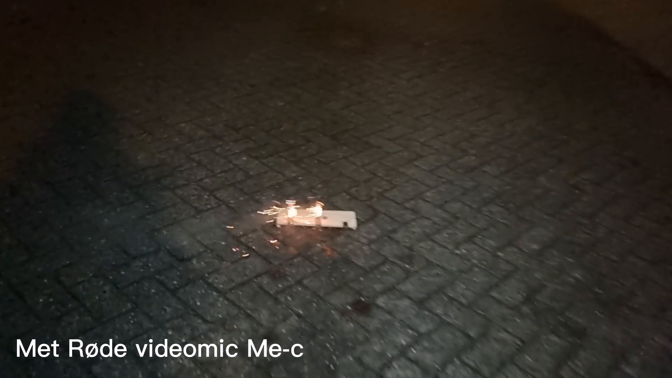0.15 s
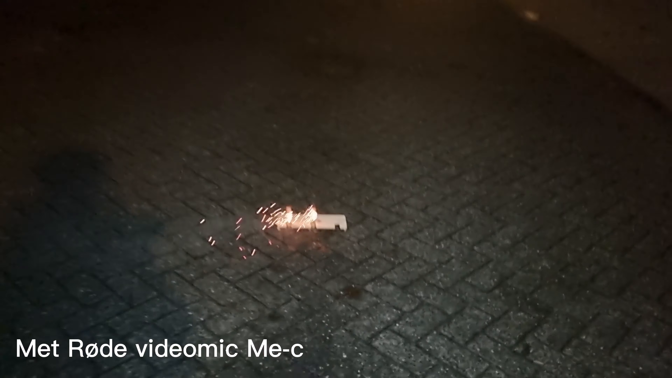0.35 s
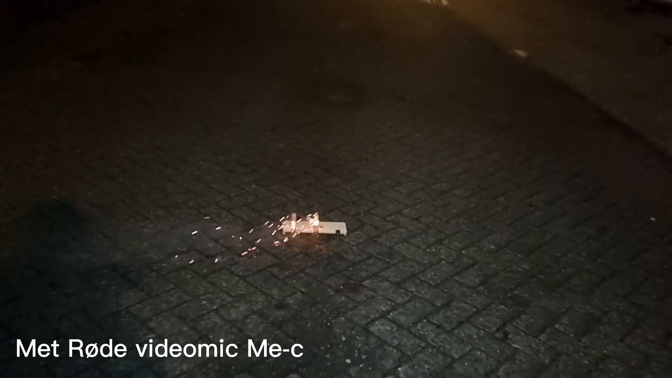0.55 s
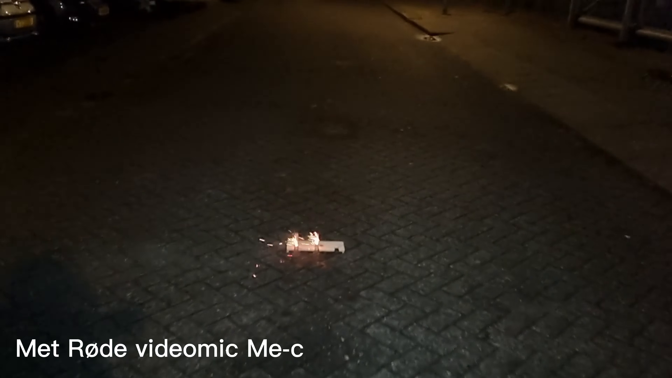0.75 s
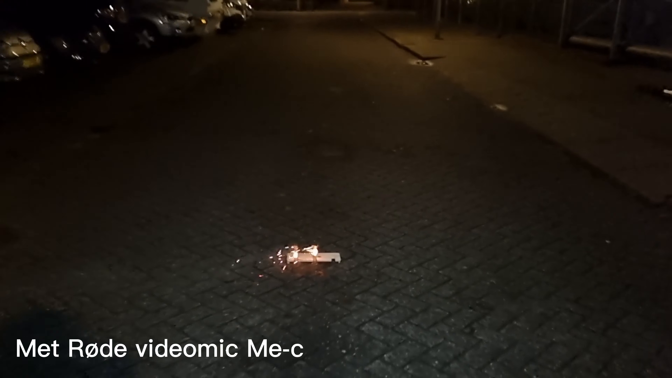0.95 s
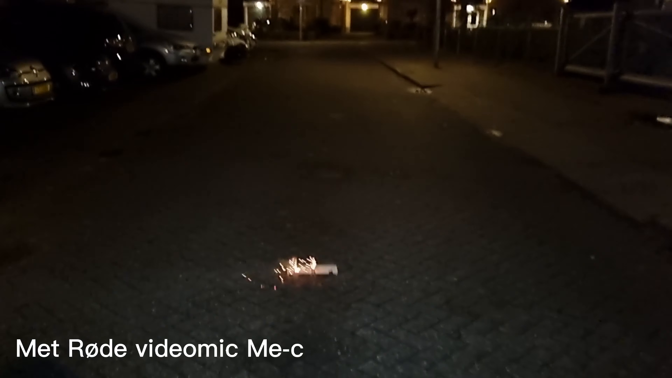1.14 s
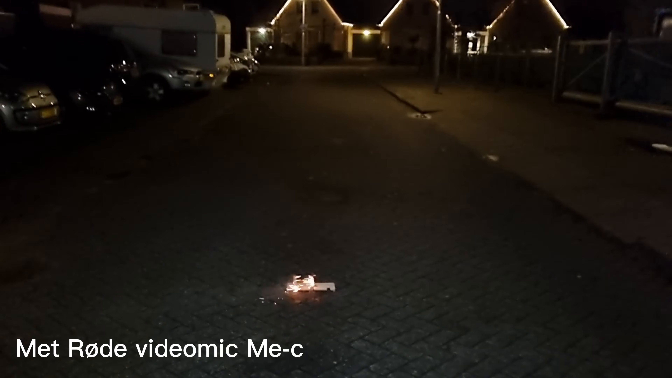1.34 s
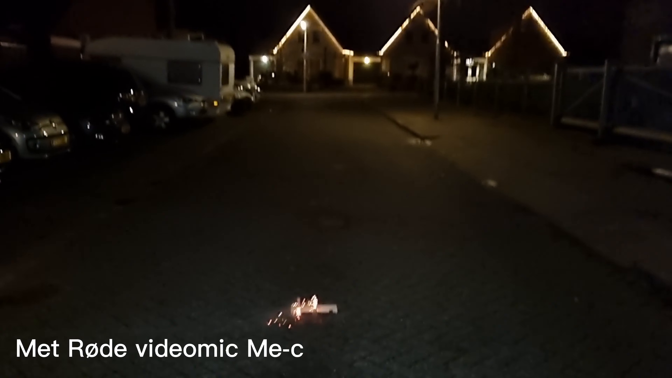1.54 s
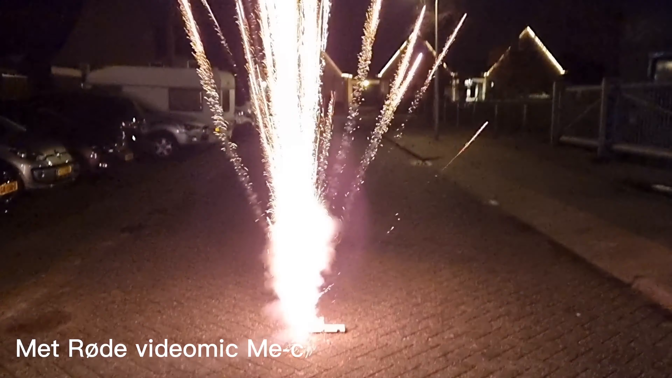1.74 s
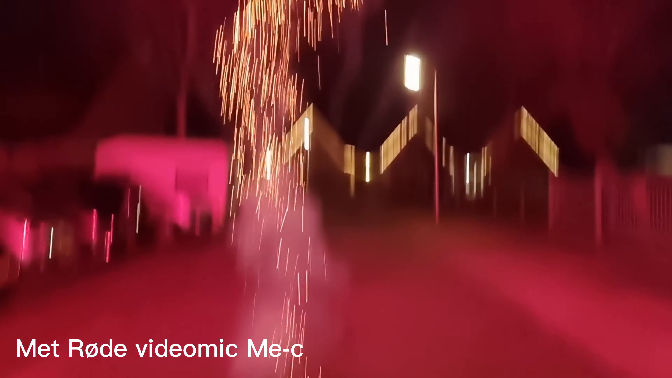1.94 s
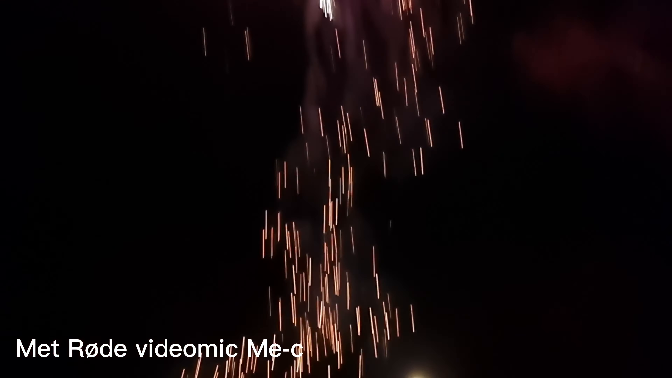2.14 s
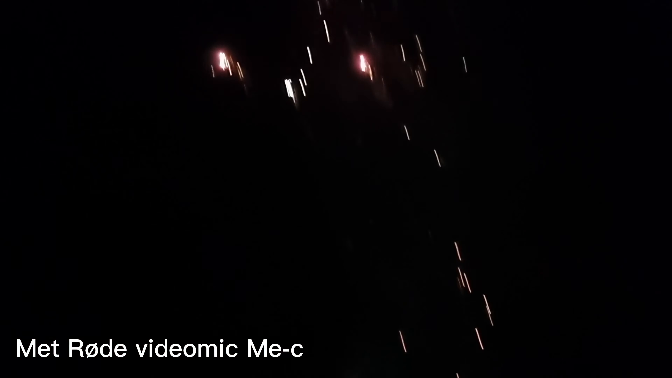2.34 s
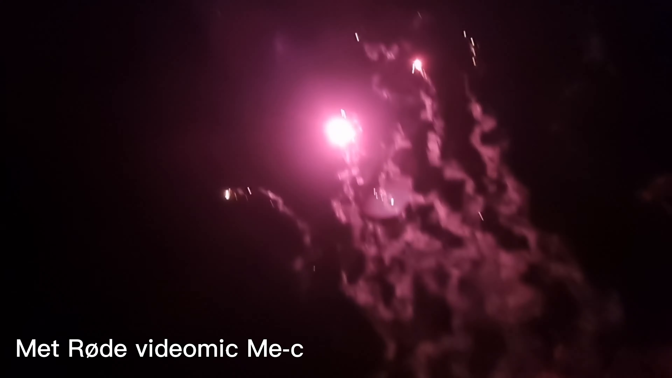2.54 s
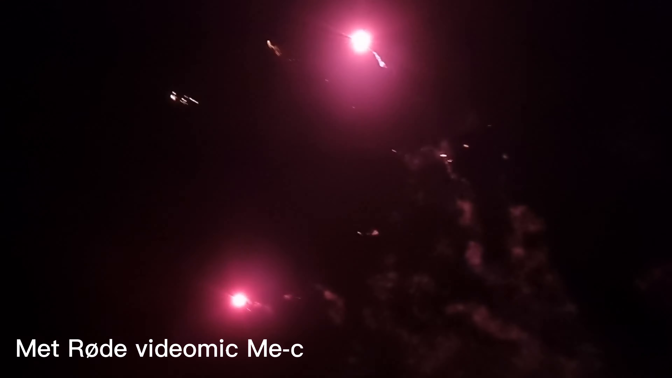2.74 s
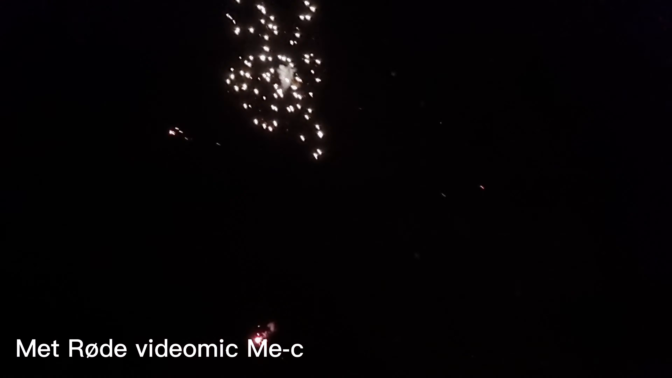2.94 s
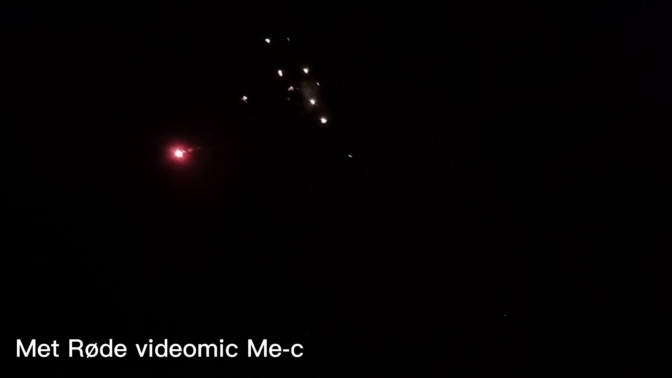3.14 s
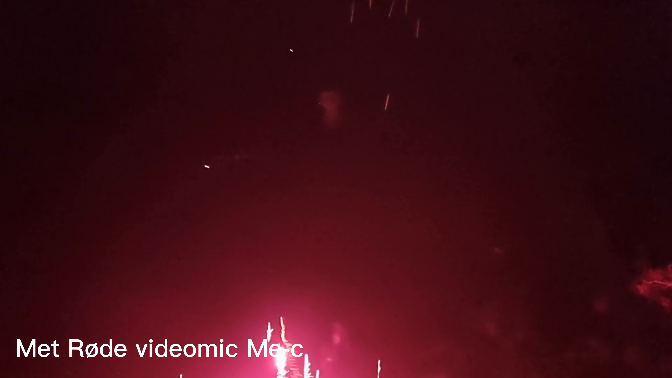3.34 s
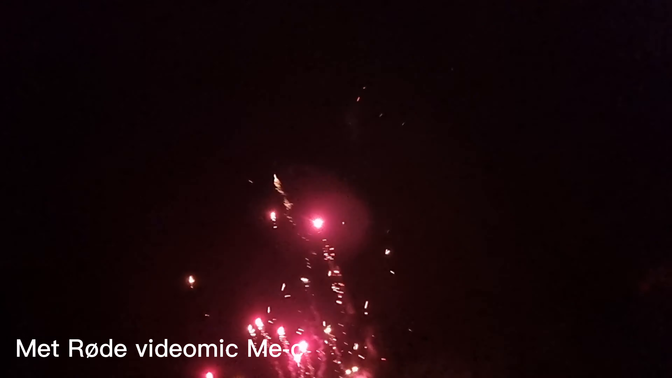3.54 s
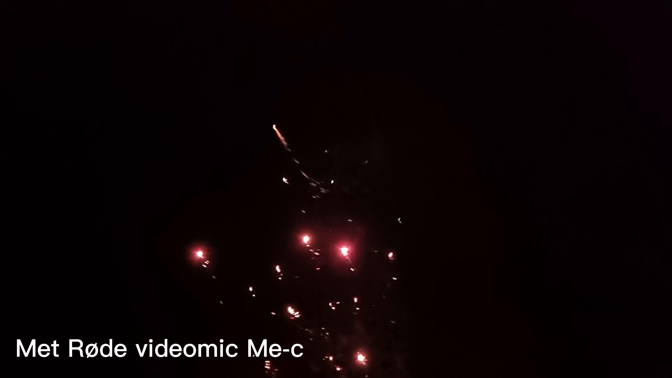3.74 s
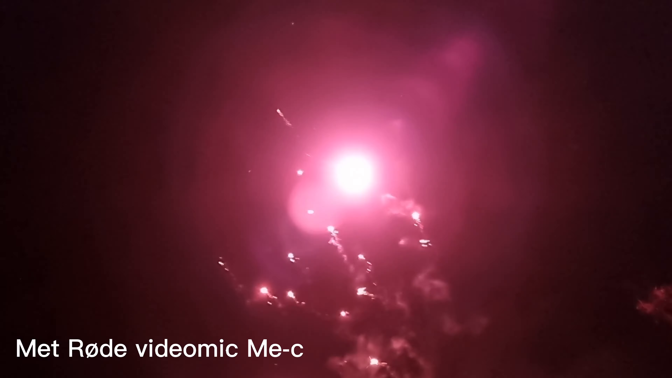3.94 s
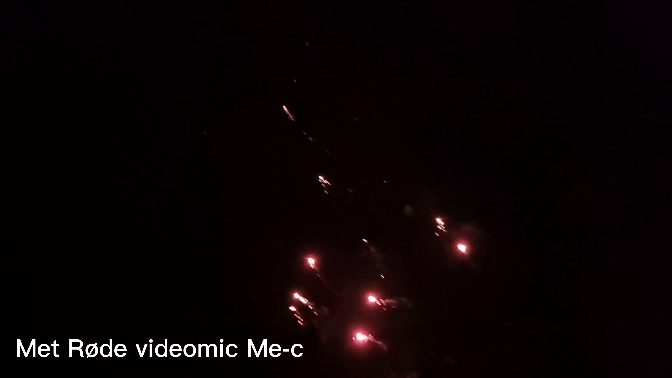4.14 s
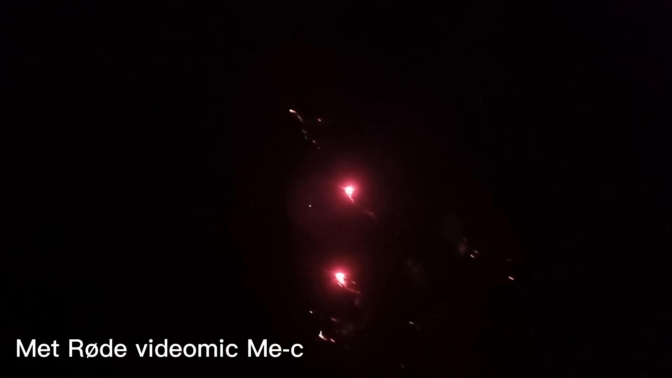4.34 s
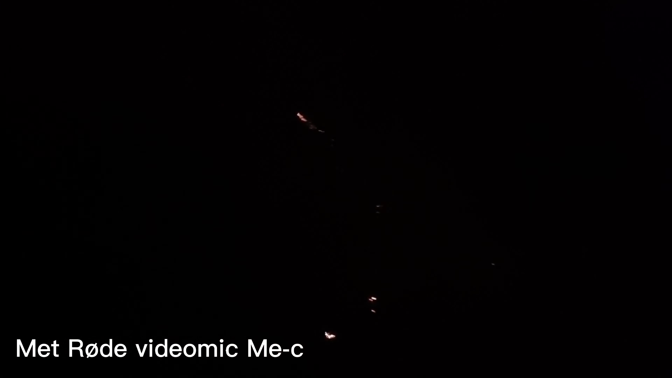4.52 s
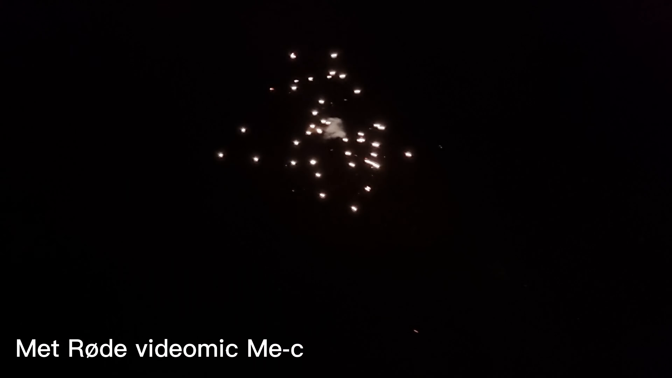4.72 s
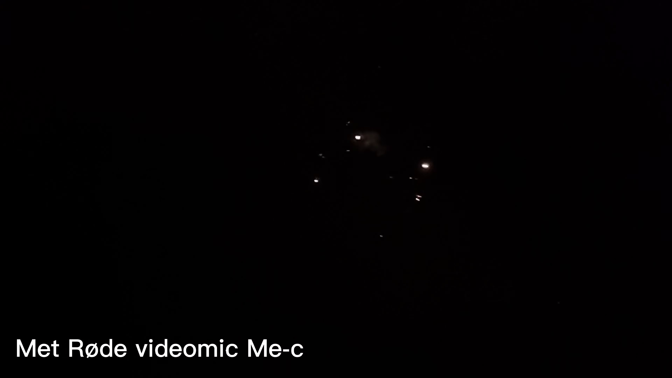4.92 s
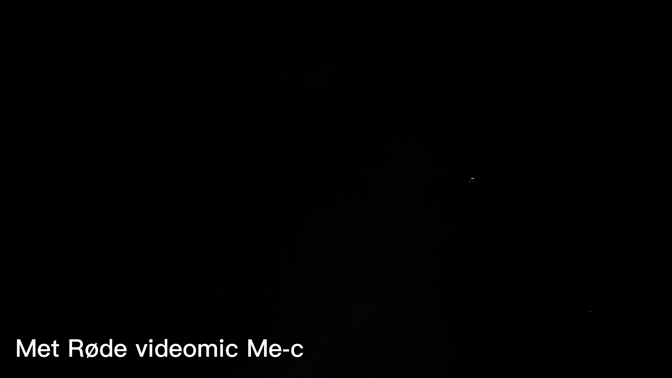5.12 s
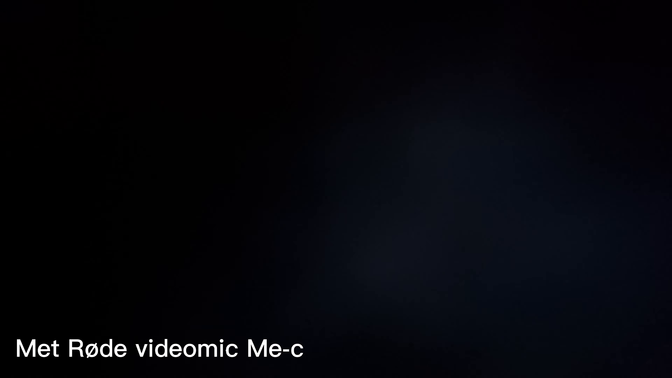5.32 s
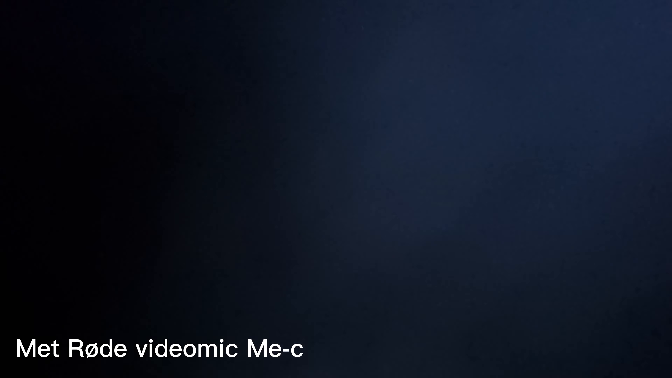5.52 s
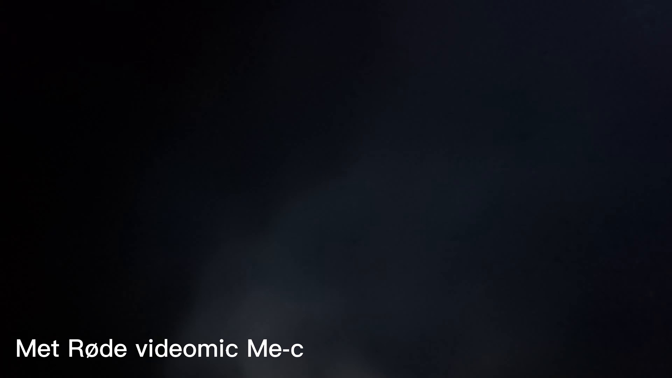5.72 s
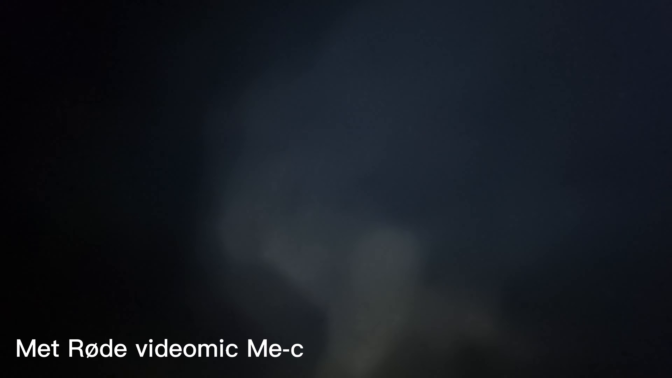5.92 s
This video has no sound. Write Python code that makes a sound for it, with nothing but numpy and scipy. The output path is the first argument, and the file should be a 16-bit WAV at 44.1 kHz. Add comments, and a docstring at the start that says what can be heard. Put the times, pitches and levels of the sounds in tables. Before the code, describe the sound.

A fuse hisses and sputters outdoors, with soft bumps and air rumble on a hand-held microphone. Then a small firework fires two shots, each a hard launch bang followed by faint hissing sparks and a sharp crack overhead. The middle two of the four bangs come close together. All overload briefly and ring along the street, their echoes growing duller until a faint distant town background remains.

```python
"""Paved street at night: a small firework cake fires two shots. The fuse fizzes, each charge lifts off,
its stars hiss upward and the shell bursts overhead. Each blast pins the microphone briefly, then echoes
from cars and house fronts, duller with distance. The hand-held microphone picks up bumps and air rumble;
a distant town lies underneath."""
import sys
import numpy as np
from scipy import signal
from scipy.fft import rfft, irfft, next_fast_len
from scipy.io import wavfile

SR = 44100
rng = np.random.default_rng(int(sys.argv[2]) if len(sys.argv) > 2 else 0)


def master(y):
    """Save y as 16-bit WAV."""
    cut = np.clip(np.atleast_2d(y).T, -1, 1)
    pcm = np.round(cut * 32767)  # scale
    wavfile.write(sys.argv[1], SR, pcm.astype(np.int16))


N = 263277
TIME_S = np.arange(N) / SR

# Spectra of town, air rumble, flame, fuse hiss, tube rush, star hiss: f/Hz, level/dB
TOWN_SPECTRUM = [(60, 0), (300, -11.5), (700, -7.5), (1500, -20.5), (3000, -23), (6000, -33), (15000, -48)]
RUMBLE_SPECTRUM = [(15, -45.5), (25, 10.5), (64, 4.5), (81, 4.5), (236, -5.5), (394, -14.5), (430, -17),
                   (464, -24.5), (500, -15.5), (650, -51.5), (1100, -120)]
FLAME_SPECTRUM = [(300, 1), (600, -0.5), (1100, -1), (2000, -5), (3800, -5.5), (5500, -8), (7000, -10.5),
                  (10000, -45.5)]
FUSE_SPECTRUM = [(2940, -54.5), (5000, -5.5), (5550, -13), (6460, -7), (7100, -3.5), (8540, 0.5),
                 (10500, -6.5), (12300, -3), (14900, -3.5), (15500, -5)]
TUBE_SPECTRUM = [(120, -34.5), (200, 2.5), (237, 4.5), (613, -1.5), (689, -0.5), (897, -14), (1170, -9),
                 (2500, -43.5), (3250, -53.5), (5500, -120)]
STAR_SPECTRUM = [(2940, -9), (5000, -5), (6340, -7), (8500, -1), (10800, -11), (14000, -8), (15500, -13.5)]
# Microphone bumps: t/s, level/dB, f/Hz
MIC_BUMPS = [(0.017, -15.5, 153), (0.329, -12.5, 130), (0.37, -10, 115), (.398, -11, 124),
             (.418, -20.5, 381), (0.976, -13.5, 191), (1.229, -21, 122), (2.598, -22, 73.6),
             (2.7, -25, 88.5), (4.208, -27, 69), (4.478, -15, 75.6)]
# Loudest star spits: t/s, relative level/dB, length/s
STAR_SPITS = [(2.213, -24, .0074), (2.369, -26, 0.027), (2.493, -26, 0.0065), (3.767, -23, .0074),
              (3.94, -24.5, .02), (4.499, -24.5, 0.011)]
# Street echo spectra: f/Hz, level/dB
LIFT_ECHO_SPECTRUM = [(24, -43), (40, -10.5), (80, -9.5), (114, 9), (260, -3.5), (333, -2), (591, -7),
                      (881, -7), (1160, -9.5), (1770, -8), (1910, -11.5), (2770, -12), (3560, -17.5),
                      (8110, -24), (15500, -42.5)]
BURST_ECHO_SPECTRUM = [(35, -50), (60, -14.5), (139, 1), (183, -4.5), (231, -1), (376, -2), (413, -3.5),
                       (642, -2.5), (688, -1.5), (1380, -10), (2050, -10.5), (3670, -17), (6410, -18),
                       (9300, -25), (15500, -45.5)]
# Slaps off cars and house fronts: delay/s, relative level/dB, f/Hz, width/Hz, length/s
LIFT_SLAPS = [(.021, -9.5, 2200, 5000, 0.0053), (.073, -12, 2200, 2000, 0.0089),
              (.136, -15, 1660, 1400, .025), (.3415, -13.5, 1700, 3800, .0055),
              (.344, -22, 150, 190, 0.037), (.354, -10.5, 800, 2010, 0.0031),
              (.362, -21, 1480, 3970, 0.0098)]
# Slaps off roofs and brickwork: delay/s, relative level/dB, f/Hz, width/Hz, length/s
BURST_SLAPS = [(.035, -10, 5650, 1290, .002), (.074, -13, 557, 797, .026), (.154, -12.5, 593, 900, 0.029),
               (.304, -11, 440, 950, 0.029), (.34, -16, 2150, 850, .016), (.395, -21.5, 1920, 1507, .009)]
# Lift charges: t/s, blast/dB, echo/dB, echo hold/s, echo tilt/(dB/oct), echo bass/dB,
# spark rush/dB, slaps/dB, stars/dB
LIFT_CHARGES = [(1.6824, 2, -8.5, 0.14, 1, -2, -12.5, 0, -35),
                (3.1011, 6.5, -12.5, 0.14, 0.5, -6, -14, -6, -32.5)]
# Shell bursts: t/s, blast/dB, echo/dB, echo hold/s, echo tilt/(dB/oct), echo bass/dB, slaps/dB
SHELL_BURSTS = [(2.843, 3, -8.5, 0.17, -0.1, -3.5, 0.5), (4.5788, 5.5, -8.5, 0.23, 0.14, -1.5, -3)]

MIC_STOP_S = 2.25  # microphone backs away until then


def undb(db):
    """dB to gain."""
    return 10 ** (np.asarray(db) / 20)


def unit(x):
    """Scale to rms 1."""
    return x / np.sqrt(np.mean(x ** 2))


def add(out, at_s, x):
    """Mix x into out from at_s."""
    i = int(at_s * SR)
    out[i:i + len(x)] += x[:len(out) - i]


def until(at_s, fade_s):
    """Smooth gain step from 1 to 0 around at_s."""
    return .5 - .5 * np.tanh(.5 * (TIME_S - at_s) / fade_s)


def walk(rate_hz):
    """Slow random drift, spread near 1."""
    steps = rng.standard_normal(N // 20)
    return np.interp(TIME_S * rate_hz, np.arange(len(steps)), steps)


def colour(x, spectrum, tilt_db_oct=0, bass_db=0):
    """Filter by a spectrum, a tilt and a 220 Hz bass shelf; rms 1."""
    size = next_fast_len(len(x))
    f_hz = np.fft.rfftfreq(size, 1 / SR) + 1
    points_hz, points_db = np.transpose(spectrum)
    gain_db = np.interp(np.log(f_hz), np.log(points_hz), points_db)
    gain_db += tilt_db_oct * np.log2(f_hz) + bass_db / (1 + (f_hz / 220) ** 4)
    return unit(irfft(rfft(x, size) * undb(gain_db), size)[:len(x)])


def band_noise(size, centre_hz, width_hz):
    """Noise in a bell-shaped band; rms 1."""
    f_hz = np.fft.rfftfreq(size, 1 / SR)
    bell = np.exp(-2 * ((f_hz - centre_hz) / width_hz) ** 2)
    return unit(irfft(rfft(rng.standard_normal(size)) * bell, size))


def puff(centre_hz, width_hz, length_s):
    """Band noise, fast rise and decay; rms 1 at its peak."""
    age = 2 * TIME_S[:SR // 4] / length_s
    envelope = age * np.exp(1 - age)
    noise = band_noise(len(age), centre_hz, width_hz)
    return unit(envelope * noise) * np.sqrt(np.mean(envelope ** 2))


def grains(size, rate_hz, spread_db):
    """Dense clicks of random sign and strength; rms 1."""
    hits = rng.random(size) < rate_hz / SR
    return unit(hits * rng.standard_normal(size) * undb(spread_db * rng.standard_normal(size)))


def town(level_db=-48):
    """Distant town: faint, drifting noise."""
    return colour(rng.standard_normal(N), TOWN_SPECTRUM) * undb(level_db + walk(4))


def handling(moving_db=-29, still_db=-39, bump_s=0.019):
    """Air rumble, weaker once the microphone stops, plus dull, damped bumps."""
    rumble_db = still_db + (moving_db - still_db) * until(MIC_STOP_S, fade_s=0.09)
    out = colour(rng.standard_normal(N), RUMBLE_SPECTRUM) * undb(rumble_db + 2 * walk(15))
    t_s = TIME_S[:SR // 4]
    age = 2 * t_s / bump_s
    for at_s, level_db, f_hz in MIC_BUMPS:
        ring = age * np.exp(1 - age) * np.sin(2 * np.pi * f_hz * t_s)
        thud = puff(f_hz, 1.5 * f_hz, bump_s)
        add(out, at_s, undb(level_db) * (0.62 * ring + 0.4 * thud))
    return out


def burning(hiss_gain, flame_gain, hiss_spectrum, flicker_db, spark_rate_hz):
    """Burning powder: bright hiss of tiny sparks over the duller rush of the flame."""
    hiss = colour(grains(N, spark_rate_hz, spread_db=-1.5), hiss_spectrum)
    flame = colour(grains(N, spark_rate_hz, spread_db=3.5), FLAME_SPECTRUM)
    flame *= undb(1 + 0.56 * walk(29))
    return (hiss * hiss_gain + flame * flame_gain) * undb(flicker_db * walk(81))


def smoulder(level_db=-73.5, rekindle_s=5.8, rise_db_per_s=48):
    """The cake glows with a faint hiss, growing at the end as the fire creeps on."""
    gain = undb(level_db + rise_db_per_s * np.maximum(TIME_S - rekindle_s, 0))
    return burning(gain, gain * undb(4), STAR_SPECTRUM, flicker_db=4.7, spark_rate_hz=12000)


def fuse(hiss_1m_db=-34, flame_db=-38, start_m=0.92, retreat_m_per_s=0.55):
    """Fuse fizz: the hiss falls with distance, the flame's rush fills the street evenly."""
    distance_m = start_m + retreat_m_per_s * np.minimum(TIME_S, MIC_STOP_S)
    hiss_gain = undb(hiss_1m_db) / distance_m
    fizz = burning(hiss_gain, undb(flame_db), FUSE_SPECTRUM, flicker_db=-1, spark_rate_hz=20000)
    # Paving bounce: its notch rises with distance.
    extra_path_m = 0.049 / distance_m
    return fizz + 0.34 * np.interp(TIME_S - extra_path_m / 343, TIME_S, fizz)


def tube(entry_s=1.16, flare_db=-38, attack_s=0.01, start_db=-34.5, rise_db_per_s=15.5):
    """Fire enters the tube: a flare, then a swelling hollow rush."""
    flare = undb(flare_db) * puff(1100, 6500, 0.07)
    age_s = np.maximum(TIME_S - entry_s, 0)
    attack = 1 - np.exp(-age_s / attack_s)
    swell = undb(start_db + rise_db_per_s * age_s + 0.81 * walk(40))
    out = colour(rng.standard_normal(N), TUBE_SPECTRUM) * attack * swell
    add(out, entry_s, flare)
    return out


def stars(climb_s=0.37, burn_s=1.356, flame_db=5, flame_db_per_s=-12.5, spit_db=-13):
    """Stars hiss and spit, fainter as they climb, until burnt out; their flame shrinks faster."""
    hiss_gain, flame_gain = np.zeros(N), np.zeros(N)
    for at_s, *_, stars_db in LIFT_CHARGES:
        age_s = np.maximum(TIME_S - at_s, 0)
        alight = (TIME_S > at_s) * until(at_s + burn_s, fade_s=0.013)
        gain = undb(stars_db) / (1 + age_s / climb_s) * alight
        hiss_gain += gain
        flame_gain += gain * undb(flame_db + flame_db_per_s * age_s)
    sputter = undb(0.6 * walk(22))
    out = burning(hiss_gain * sputter, flame_gain, STAR_SPECTRUM, flicker_db=1.7, spark_rate_hz=12000)
    for at_s, level_db, length_s in STAR_SPITS:
        add(out, at_s - .002, undb(level_db + spit_db) * puff(7200, 10000, length_s))
    return out


def street(spectrum, tilt_db_oct, bass_db, hold_s, fall_power, build_s, patchy_db, rate_hz):
    """Dense echoes: level while near walls answer, then a power-law decay."""
    size = 3 * SR
    t_s = TIME_S[:size]
    echoes = grains(size, rate_hz, spread_db=1.5) * undb(patchy_db * walk(130)[:size])
    paving_bounce = 0.035 * np.roll(echoes, int(.00405 * SR))
    echoes = colour(echoes + paving_bounce, spectrum, tilt_db_oct, bass_db)
    # Air absorbs treble along the path; spectrum unchanged at 70 ms.
    f_hz, delay_s, frames = signal.stft(echoes, SR, nperseg=512)
    loss_db = 1.88 * (f_hz[:, None] / 1000) ** 1.484 * (delay_s - .07)
    echoes = signal.istft(frames * undb(-loss_db), SR)[1][:size]
    return echoes * (1 - np.exp(-t_s / build_s)) / np.sqrt(1 + (t_s / hold_s) ** fall_power)


def slaps(reflections):
    """Single surfaces return short slaps, each with its own delay and band."""
    out = np.zeros(SR)
    for delay_s, level_db, centre_hz, width_hz, length_s in reflections:
        add(out, delay_s, undb(level_db) * puff(centre_hz, width_hz, length_s))
    return out


def blast(level_db, push_s, suck_s, kick_s=.00012):
    """Shock front: a brief reverse kick of the microphone, overpressure, then longer, weaker suction."""
    t_s = TIME_S[:int((push_s + suck_s) * SR)]
    push = 1 - .5 * t_s / push_s
    suction = -.6 * (1 - (t_s - push_s) / suck_s)
    wave = np.where(t_s < push_s, push, suction)
    return undb(level_db) * np.where(t_s < kick_s, -wave, wave)


def lifts(jet_db=4, jet_s=0.0022, leak_db=-17, leak_s=0.011):
    """Gas jets from the tube, the charge blows, sparks rush up, the street answers."""
    out = np.zeros(N)
    lead_s = TIME_S[:SR // 20][::-1]
    swell = undb(jet_db) * np.exp(-(lead_s / jet_s) ** 2) + undb(leak_db) * np.exp(-lead_s / leak_s)
    for at_s, blast_db, echo_db, hold_s, tilt_db_oct, bass_db, rush_db, slaps_db, _ in LIFT_CHARGES:
        add(out, at_s - lead_s[0], swell * band_noise(len(lead_s), 3000, 15000))
        add(out, at_s, blast(blast_db, push_s=0.00093, suck_s=0.012))
        rush = puff(3300, 10000, 0.039)
        add(out, at_s + .011, undb(rush_db - 2.5 + 2.7 * walk(310)[:len(rush)]) * rush)
        # Coarse echoes: at ground level, parked cars answer one by one.
        echoes = street(LIFT_ECHO_SPECTRUM, tilt_db_oct, bass_db, hold_s,
                        fall_power=4.34, build_s=0.00057, patchy_db=1, rate_hz=4500)
        add(out, at_s + .007, undb(echo_db) * echoes)
        add(out, at_s, undb(slaps_db) * slaps(LIFT_SLAPS))
    return out


def bursts(near_slap_db=-5):
    """Shells crack overhead: one shock, a slap off the nearest surface, then the street rings."""
    out = np.zeros(N)
    for at_s, blast_db, echo_db, hold_s, tilt_db_oct, bass_db, slaps_db in SHELL_BURSTS:
        add(out, at_s, blast(blast_db, push_s=0.0011, suck_s=0.0078))
        near_slap = puff(14100, 3500, 0.00027) + puff(1500, 3000, 0.00034)
        add(out, at_s + .0108, undb(near_slap_db) * near_slap)
        echoes = street(BURST_ECHO_SPECTRUM, tilt_db_oct, bass_db, hold_s,
                        fall_power=4.285, build_s=0.00096, patchy_db=0.66, rate_hz=12000)
        add(out, at_s + .0105, undb(echo_db) * echoes)
        add(out, at_s, undb(slaps_db) * slaps(BURST_SLAPS))
    return out


def scene():
    """Mono sum at the microphone; fuse and tube stop at the first lift."""
    before_lift = TIME_S < LIFT_CHARGES[0][0]
    mix = town() + (fuse() + tube()) * before_lift + lifts() + stars() + smoulder() + bursts()
    return (mix + handling())[None]


def record(dry, ceiling=0.69, low_cut_hz=46, high_cut_hz=15700):
    """The input saturates; the low cut turns each pinned stretch into a slow swing."""
    pinned = dry / (1 + (dry / ceiling) ** 10) ** (1 / 10)
    low_cut = signal.butter(4, low_cut_hz, "high", fs=SR, output="sos")
    high_cut = signal.ellip(12, .2, 80, high_cut_hz, fs=SR, output="sos")
    clipped = np.clip(signal.sosfilt(low_cut, pinned), -1, 1)
    return signal.sosfilt(high_cut, clipped)


dry = scene()
out = record(dry)
master(out)
```